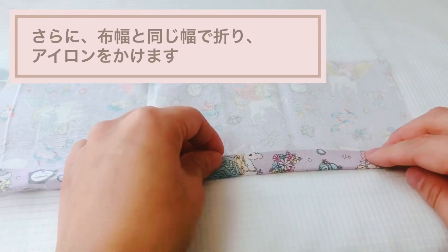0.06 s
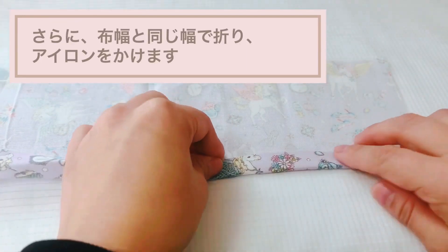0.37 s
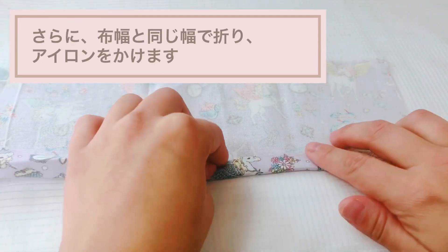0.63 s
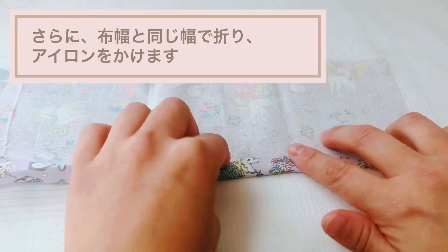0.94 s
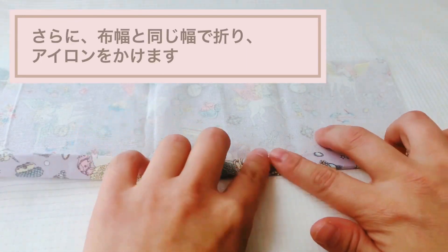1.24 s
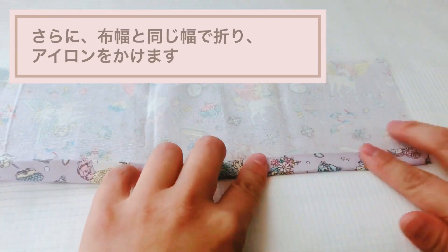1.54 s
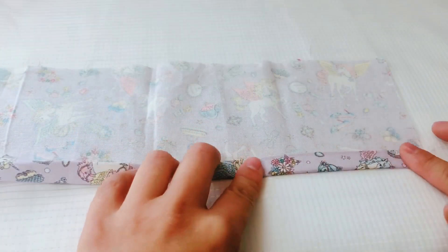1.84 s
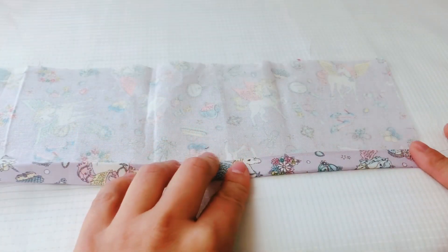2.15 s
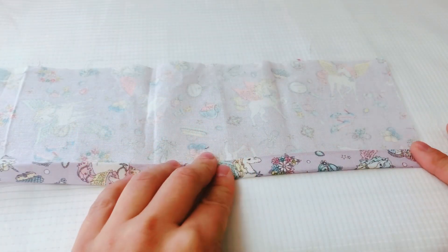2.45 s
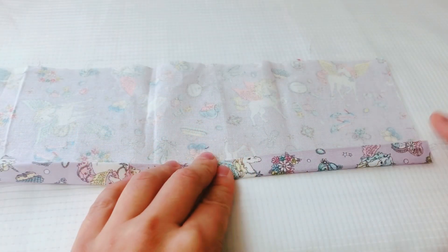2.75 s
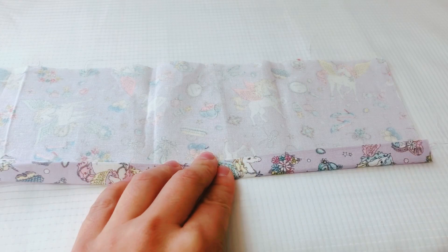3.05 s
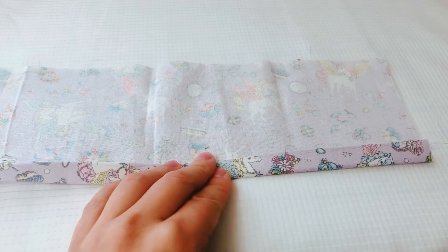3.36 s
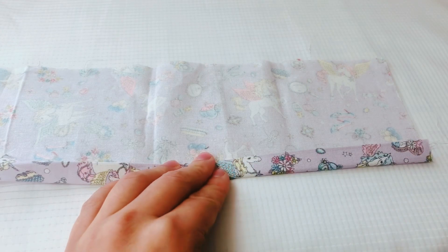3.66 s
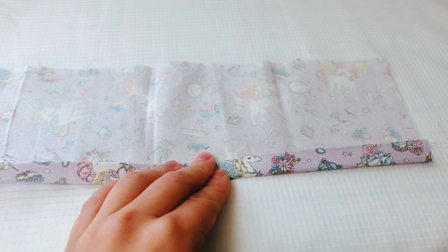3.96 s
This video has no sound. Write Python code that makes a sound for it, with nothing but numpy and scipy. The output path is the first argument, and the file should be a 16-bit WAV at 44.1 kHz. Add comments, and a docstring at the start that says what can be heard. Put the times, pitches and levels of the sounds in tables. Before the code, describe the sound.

Thin cloth rustles softly under smoothing fingers, ending with two sharp knocks on the camera.

```python
"""At a table in a quiet, humming room, fingers smooth and press a fold of thin cloth, heard from close by.
Each stroke is a soft friction hiss of slipping threads over the dull rub of the table; creases tick,
fingertips tap and the table rumbles faintly under the hand. At the end a sleeve rustles and a hand
takes hold of a camera: scuffs, a click and two sharp knocks that excite the resonances of its case."""
import sys
import numpy as np
from scipy import signal
from scipy.fft import rfft, irfft, next_fast_len
from scipy.io import wavfile
from scipy.ndimage import map_coordinates

SR = 44100
rng = np.random.default_rng(int(sys.argv[2]) if len(sys.argv) > 2 else 0)


def materialize(psi):
    """Save the field psi as 16-bit PCM at rate SR to the path in sys.argv[1].

    A 1-D psi becomes a single channel; in a 2-D psi each row is a channel.
    """
    bounded = np.clip(np.atleast_2d(psi).T, -1, 1)
    quanta = np.round(bounded * 32767).astype(np.int16)
    wavfile.write(sys.argv[1], SR, quanta)


N = 176400


def cloth_strokes(slips_per_s=2500, slip_share=0.37, catches_per_s=60, flutter_db=0.27):
    """Stick-slip friction: threads slip in a dense hiss and now and then catch; the table adds a rub."""
    # finger strokes: start_s, rise_s, hold_s, release_s, level_db, tilt_db_per_octave, swish_hz,
    # rub_re_hiss_db
    strokes = [(-.03, .02, 0.08, 0.046, -59, -4.5, 7600, -7),
               (0.057, .013, .003, 0.014, -50, -5, 8000, -15),
               (0.066, 0.021, .08, .05, -67.5, 1, 7500, -19), (0.181, .03, 0.07, 0.21, -64, -2, 8500, -8.5),
               (0.308, 0.19, .19, .13, -59.5, 0.5, 14000, -14),
               (.712, 0.034, 0.031, 0.084, -58, 1.5, 8200, -9.5),
               (0.78, 0.083, 0.13, 0.12, -63.5, 0.3, 12000, -14),
               (1, .075, 0.028, 0.078, -55, -0.1, 12400, -13.5),
               (1.112, .05, 0.046, 0.09, -61, -1.5, 8500, -9.5),
               (1.255, 0.09, .04, 0.054, -60, 0.5, 13000, -9.5),
               (1.326, .095, 0.026, 0.12, -48, 4, 12100, -16.5),
               (1.41, 0.094, 0.12, .23, -52.5, -1, 7160, -17),
               (1.784, 0.093, 0.021, .12, -66.5, -2, 8500, -4),
               (1.917, 0.08, 0.032, 0.2, -66.5, -3, 9000, -4),
               (2.278, 0.14, .04, .08, -67.5, -2, 12900, -6.5),
               (2.74, 0.046, 0.026, .05, -73.5, -3, 8000, -4),
               (3.648, 0.024, 0.013, 0.072, -58.5, 3, 14000, -15),
               (3.674, 0.056, 0.037, 0.11, -63, -1.5, 14000, -14)]
    # spectrum of the thread hiss: frequency_hz, level_db
    weave = [(500, -27), (1500, -15), (2600, -10.5), (3250, -2), (4800, -6), (5800, -1.5), (8300, 0),
             (10700, -1), (13800, 0.5), (16000, 1)]
    # spectrum of the table rubbed through the cloth: frequency_hz, level_db
    rub = [(150, -2.5), (400, -0.5), (650, -1), (950, 0.5), (1500, -3.5), (2500, -12), (5000, -9),
           (12000, -45)]
    out = np.zeros(N)
    for start, rise, hold, release, db, tilt_db, swish_hz, rub_db in strokes:
        catches = pops(catches_per_s) * amp(10 + 3.5 * rng.standard_normal(N))
        slips = np.sqrt(slip_share) * unit(pops(slips_per_s))
        sliding = np.sqrt(1 - slip_share) * rng.standard_normal(N)
        hiss = coloured(swish(slips + sliding + catches, swish_hz), weave, tilt_db)
        out += amp(db) * swell(start, rise, hold, release) * (hiss + amp(rub_db) * noise(rub))
    return out * amp(flutter_db * wobble(54))  # uneven finger pressure


def swish(x, centre_hz, lift_db=1.5, sigma_octaves=0.38):
    """Friction noise has a broad spectral peak, which lies higher for faster fingers."""
    octaves = np.log2((np.fft.rfftfreq(N, 1 / SR) + 1) / centre_hz)
    return irfft(rfft(x) * amp(lift_db * np.exp(-.5 * (octaves / sigma_octaves) ** 2)), N)


def shifting_contact(x, depth_db=1.9, patch_hz=892, patch_s=.04, size=512):
    """Spectral modulation: changing contact colours the hiss in random patches of frequency and time."""
    hz, t, spectrum = signal.stft(x, SR, nperseg=size)
    grid = np.meshgrid(hz / patch_hz, t / patch_s, indexing='ij')
    patches = map_coordinates(rng.standard_normal((size, size)), grid, mode='wrap')
    return signal.istft(spectrum * amp(depth_db * patches), SR, nperseg=size)[1][:N]


def crease_ticks():
    """Buckling: creases snap as the fabric bends, each in a short burst of noise."""
    # snapping creases: time_s, level_db, tilt_db_per_octave
    creases = [(0.072, -46.5, -3), (.1248, -58, -3), (0.151, -57, -1), (0.201, -56, 5), (0.2748, -46, 3.5),
               (0.345, -54, 0), (.727, -48.5, 4), (.749, -40, -1), (1.0495, -42.5, -2), (2.161, -53, 9),
               (2.222, -61, 0), (2.654, -68, 11), (2.807, -49.5, -7), (2.815, -60, -5), (2.921, -59, 7),
               (3.1024, -55, 2)]
    # spectrum of a snap: frequency_hz, level_db
    snap = [(500, -19), (3000, -19), (5500, 4), (8500, 5), (12000, 0.5), (16000, 0)]
    return sum(amp(db) * blow(start, .0002, t60_s=0.0066) * noise(snap, tilt_db)
               for start, db, tilt_db in creases)


def fingertip_taps(width_hz=350, ring_db=11):
    """Damped resonance: a fingertip lands and the padded table rings briefly."""
    # fingertip landings: time_s, level_db, ring_hz
    landings = [(0.1243, -54.5, 1050), (0.75, -61, 750), (.964, -56, 1100), (2.808, -57, 646)]
    # spectrum of a tap: frequency_hz, level_db
    tap = [(150, -8), (500, -2), (1300, -1.5), (3000, -7), (6000, -10), (12000, -33)]
    out = np.zeros(N)
    for start, db, hz in landings:
        tone = coloured(resonant(rng.standard_normal(N), [(hz, width_hz, ring_db)]), tap)
        out += amp(db) * blow(start, 0.0014, t60_s=0.013) * tone
    return out


def case_click(start_s=3.8465, rise_s=0.0033, tail_db=-17):
    """Impact: a light click on the camera case is a noise burst with a faint tail, and two modes ping."""
    # spectrum of the click: frequency_hz, level_db
    click = [(200, -20), (750, -6.5), (1400, -11.5), (2700, -3), (3600, 0), (4100, -3), (4900, -6),
             (6000, -2), (6750, -5), (7300, -17), (10500, -16.5), (16000, -21)]
    # modes struck by the click: pitch_hz, level_db, t60_s
    pings = [(4110, -35, .012), (6670, -40.5, .011)]
    envelope = blow(start_s, rise_s, t60_s=.011) + amp(tail_db) * blow(start_s, rise_s, t60_s=0.2)
    return amp(-37) * envelope * noise(click) + ring(start_s, rise_s, pings)


def grip_scuffs():
    """Sliding friction: the grip scuffs along the camera case in short swells of noise."""
    # slides of the grip: start_s, rise_s, hold_s, release_s, level_db, tilt_db_per_octave
    scuffs = [(3.79, 0.013, 0.054, 0.037, -59, -7.5), (3.87, .016, 0.023, 0.041, -53, .5),
              (3.904, 0.0046, 0.012, 0.018, -50, -3), (3.926, 0.015, 0.017, .03, -50.5, 2)]
    # spectrum of the hand on the case: frequency_hz, level_db
    grip = [(80, -10), (150, 3.5), (450, 4.5), (1400, -3), (2500, -8.5), (4000, -11), (6800, -16),
            (8000, -21), (16000, -35)]
    return sum(amp(db) * swell(*timing) * noise(grip, tilt_db, pivot_hz=3000)
               for *timing, db, tilt_db in scuffs)


def case_knocks(rattle_db=-12.5, rattle_t60_s=0.22):
    """Modal response to impact: the camera case clacks and rattles on while its whole body thuds."""
    # impacts, two to a knock: time_s, rise_s, hold_s, level_db, tilt_db_per_octave, t60_s, thud_db
    impacts = [(3.9562, 0.0008, 0.00088, -35.5, 5.5, .02, -63),
               (3.959, 0.00068, 0.0018, -20, 0.75, 0.021, -39),
               (3.984, 0.0032, 0.0011, -25.5, -1, 0.027, -46),
               (3.990, .002, 0.00092, -36.5, -3.5, 0.04, -34.5)]
    # broad response of the case: frequency_hz, level_db
    case_response = [(100, -20), (220, -22), (400, -2), (1200, -3.5), (2500, 0), (4300, 3.5), (5700, -3.5),
                     (7500, -1), (9500, -3.5), (16000, -8)]
    # resonances of the case: centre_hz, width_hz, lift_db
    case_modes = [(370, 160, 7.5), (730, 53, 7.5), (1008, 72, 9), (1373, 150, 10.5), (1974, 150, 10),
                  (2170, 85, 9.5), (2370, 380, 9.5), (2780, 60, 10), (3110, 156, 14), (4910, 660, 6.5),
                  (6480, 200, 11.5), (7440, 200, 6)]
    # low modes of the body: pitch_hz, level_db, t60_s
    body_modes = [(378, -2.5, 0.12), (718, -2.5, 0.14)]
    out = np.zeros(N)
    for start, rise, hold, db, tilt_db, t60, thud_db in impacts:
        rattle = amp(rattle_db) * blow(start, rise, rattle_t60_s)
        envelope = np.hypot(blow(start, rise, t60, hold), rattle)  # the two add in power
        ringing = resonant(rng.standard_normal(N), case_modes)
        clack = coloured(ringing, case_response, tilt_db, pivot_hz=3000)
        out += amp(db) * envelope * clack + amp(thud_db) * ring(start, rise, body_modes)
    return out


def sleeve_rustle():
    """Fabric friction: clothing rustles faintly as the free arm reaches for the camera."""
    # the reach (signs of durations ignored): start_s, rise_s, hold_s, release_s, level_db
    reach = (3.5, 0.1, -0.1, -0.3, -68)
    # spectrum of the rustle: frequency_hz, level_db
    rustle = [(300, 11), (900, -2), (2000, -2), (4500, 0), (6500, -15), (16000, -25)]
    *timing, db = reach
    return amp(db) * swell(*timing) * noise(rustle)


def table_rumble():
    """Forced vibration: the table rumbles faintly under the weight of the hand."""
    # the hand leans: start_s, rise_s, hold_s, release_s, level_db
    presses = [(1.5, 0.12, 0.13, .15, -70), (2.18, .08, .1, .08, -68.5)]
    # spectrum of the rumble: frequency_hz, level_db
    rumble = [(22, -8), (42, 0), (70, -7), (200, -32), (1000, -62)]
    return noise(rumble) * sum(amp(db) * swell(*timing) for *timing, db in presses)


def room(air_db=-63, hum_hz=98.1, hum_db=-66.5, waver_db=2, drift_rad=0.4):
    """Superposition: low air noise, a wavering appliance hum and narrow bands of hiss form the floor."""
    # spectrum of the air noise: frequency_hz, level_db
    air = [(20, -19), (42, -6), (56, -10.5), (75, 2), (95, -0.5), (120, -7), (155, -1), (230, -8),
           (400, -6.5), (520, -15.5), (1000, -18.5), (2000, -23.5), (2800, -27.5), (5500, -26), (6500, -29),
           (12000, -33), (16000, -31.5)]
    # steady bands of hiss: centre_hz, width_hz, level_db
    hiss_bands = [(393, 66, -72.5), (2346, 190, -86), (3260, 150, -81), (4160, 230, -78), (4570, 130, -83),
                  (5320, 570, -80.5), (10000, 110, -90)]
    hum = np.sqrt(2) * np.sin(2 * np.pi * hum_hz * clock() + drift_rad * wobble(10))
    out = amp(air_db) * noise(air) + amp(hum_db + waver_db * wobble(10)) * hum
    for hz, width, db in hiss_bands:
        band = irfft(rfft(rng.standard_normal(N)) * peak(hz, width), N)
        out += amp(db) * unit(band)
    return out


def amp(db):
    """Decibels to amplitude ratio."""
    return 10 ** (np.asarray(db) / 20)


def unit(x):
    """Normalisation to rms 1."""
    return x / np.sqrt(np.mean(x ** 2) + 1e-20)


def clock():
    """Time of every sample in seconds."""
    return np.arange(N) / SR


def wobble(knots_per_s):
    """Smooth random modulation: a spline through Gaussian values."""
    return map_coordinates(rng.standard_normal(2048), [clock() * knots_per_s], mode='wrap')


def pops(per_s):
    """A Poisson train of impulses of random sign."""
    return (rng.random(N) < per_s / SR) * rng.choice([-1, 1], N)


def coloured(x, points, tilt_db=0, pivot_hz=8000):
    """Filtering by a (frequency_hz, level_db) curve, tilted by tilt_db per octave; the result has rms 1."""
    f = np.fft.rfftfreq(N, 1 / SR) + 1
    hz, db = np.transpose(points)
    curve_db = np.interp(np.log(f), np.log(hz), db)
    slope_db = tilt_db * np.log2(np.clip(f, hz[0], hz[-1]) / pivot_hz)
    low_cut = f / np.hypot(f, hz[0] / 2)
    return unit(irfft(rfft(x) * amp(curve_db + slope_db) * low_cut, N))


def noise(points, tilt_db=0, pivot_hz=8000):
    """Gaussian noise filtered to a given spectrum."""
    return coloured(rng.standard_normal(N), points, tilt_db, pivot_hz)


def peak(centre_hz, width_hz):
    """A Lorentzian resonance curve of height 1."""
    f = np.fft.rfftfreq(N, 1 / SR)
    return 1 / (1 + ((f - centre_hz) / width_hz * 2) ** 2)


def resonant(x, modes):
    """Resonance: each (centre_hz, width_hz, lift_db) mode raises a peak in the spectrum of x."""
    power = 1 + sum((amp(db) ** 2 - 1) * peak(hz, width) ** 2 for hz, width, db in modes)
    return irfft(rfft(x) * np.sqrt(np.abs(power)), N)


def swell(start, rise, hold, release):
    """Raised-cosine envelope of a hand movement."""
    ramp = np.interp(clock(), start + np.cumsum(np.abs([0, rise, hold, release])), [0, 1, 1, 0])
    return np.sin(ramp * np.pi / 2) ** 2


def blow(start, rise, t60_s, hold=0):
    """Impact envelope: a quick rise, a hold, then exponential decay."""
    t = clock() - start
    attack = np.clip(t / rise, 0, 1) ** 2
    return attack * np.exp(-np.log(1000) * np.clip((t - rise - hold) / t60_s, 0, 10))


def ring(start, rise, modes):
    """Free vibration: one damped sine for each (pitch_hz, level_db, t60_s) mode."""
    t = clock() - start
    return sum(amp(db) * blow(start, rise, t60) * np.sin(2 * np.pi * hz * t) for hz, db, t60 in modes)


def scene():
    """The sound pressures add at one microphone, which feeds both channels."""
    fabric = shifting_contact(cloth_strokes() + sleeve_rustle()) + crease_ticks()
    tabletop = fingertip_taps() + table_rumble()
    handling = case_click() + grip_scuffs() + case_knocks()
    return np.tile(fabric + tabletop + handling + room(), (2, 1))


def record(dry, top_hz=15850):
    """Band limiting: the camera passes nothing above top_hz."""
    padded = next_fast_len(N + SR // 2)
    passband = np.fft.rfftfreq(padded, 1 / SR) < top_hz
    return irfft(rfft(dry, padded) * passband, padded)[:, :N]


dry = scene()
out = record(dry)
materialize(out)
```